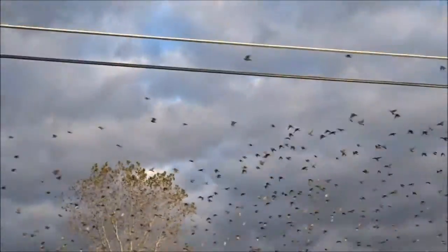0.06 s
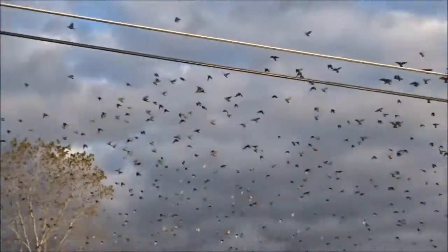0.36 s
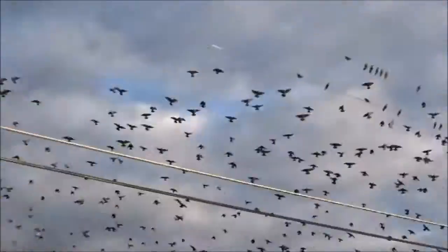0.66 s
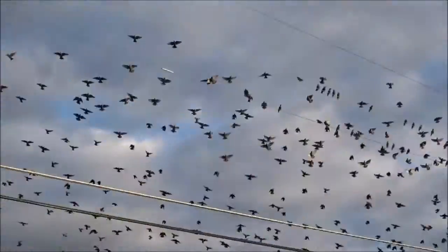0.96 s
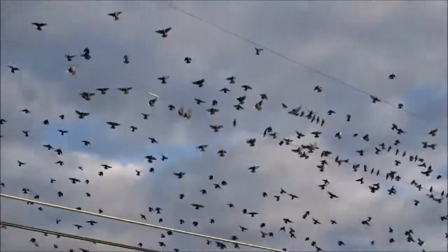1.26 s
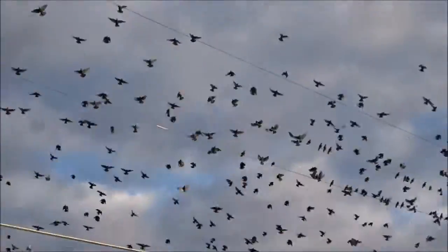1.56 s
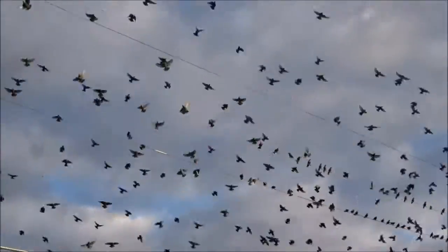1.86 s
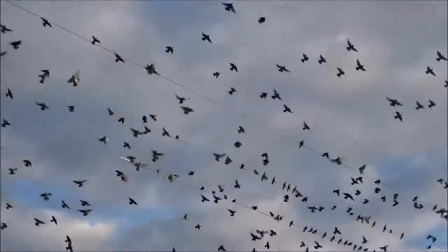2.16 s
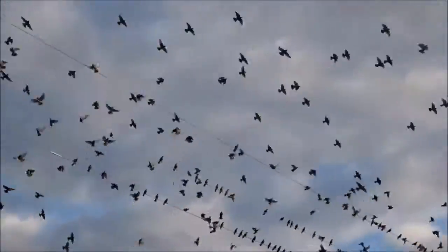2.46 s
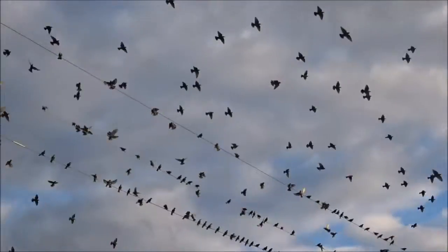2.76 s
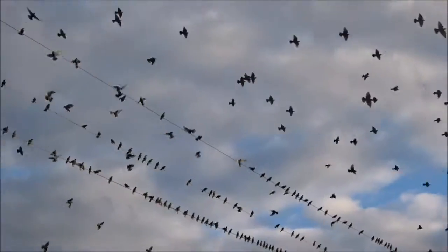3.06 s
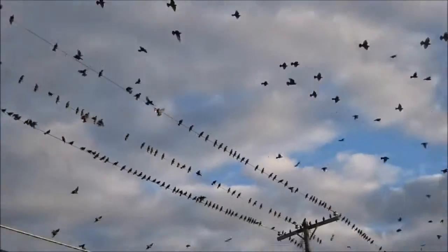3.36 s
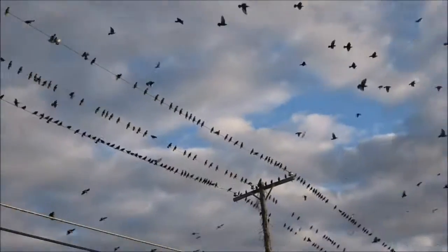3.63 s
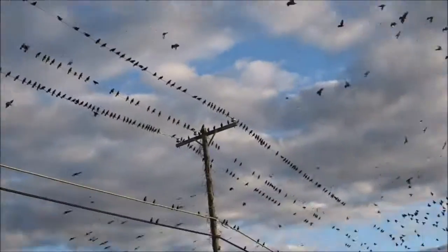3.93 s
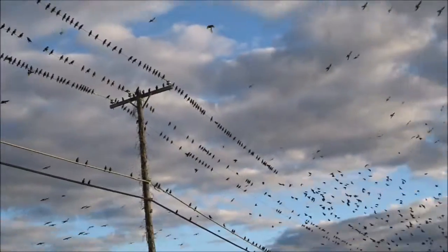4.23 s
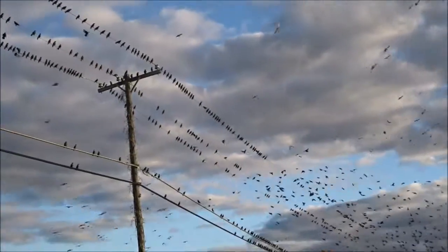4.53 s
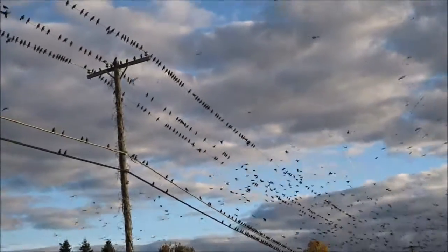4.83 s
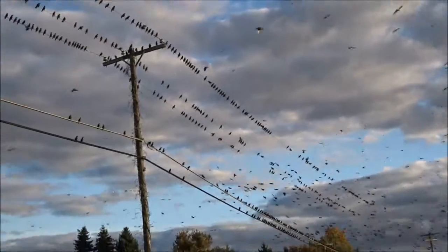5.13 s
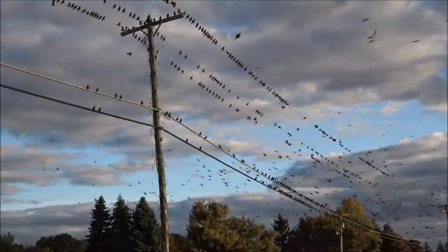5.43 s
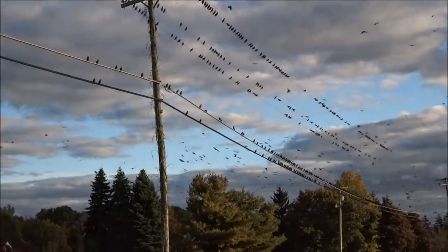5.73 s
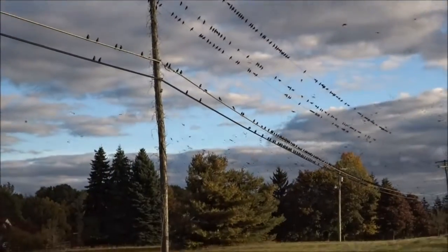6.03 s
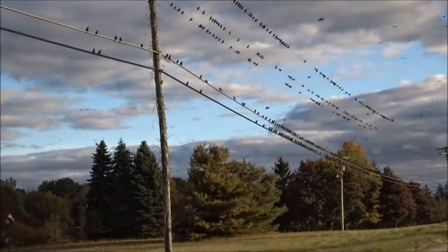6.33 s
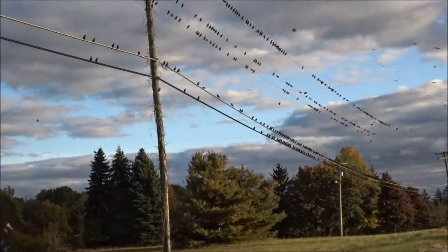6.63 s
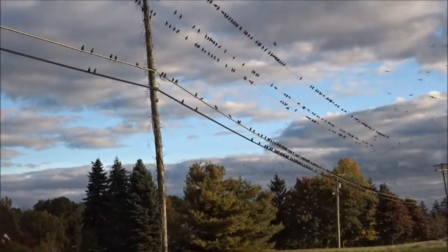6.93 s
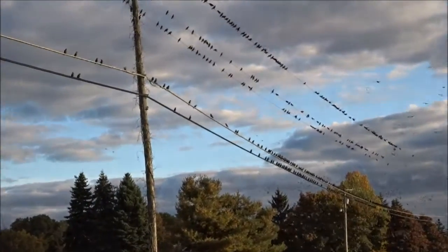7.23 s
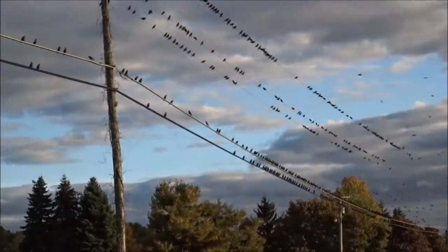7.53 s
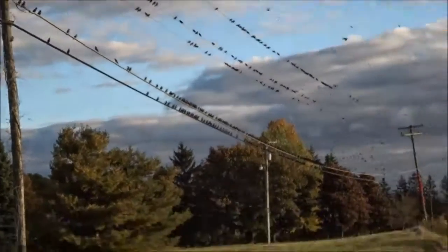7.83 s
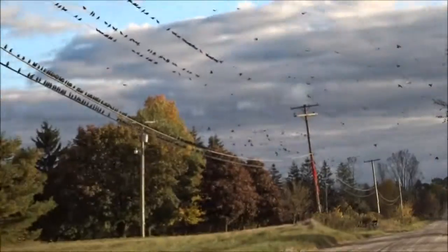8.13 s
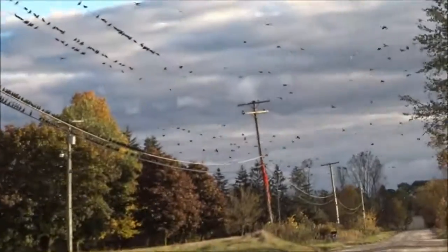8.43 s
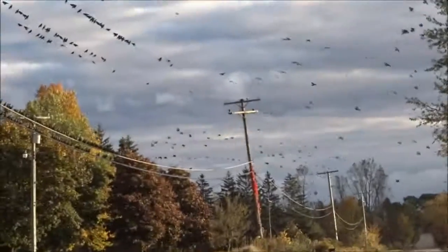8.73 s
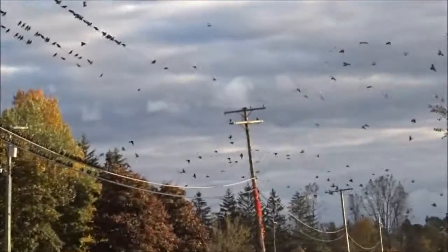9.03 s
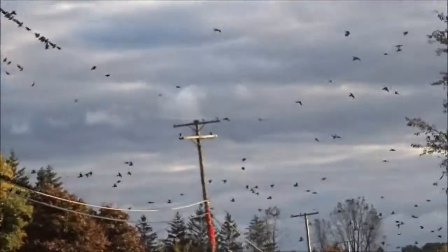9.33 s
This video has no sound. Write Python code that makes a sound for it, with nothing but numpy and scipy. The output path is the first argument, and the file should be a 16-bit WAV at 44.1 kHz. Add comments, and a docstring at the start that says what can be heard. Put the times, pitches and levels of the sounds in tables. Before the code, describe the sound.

Outdoors in open country, a dense, high babble of starlings runs throughout, dotted with nearby squeaks, thin whistles and harsh rasps. Early on there is one quick swish, and gusts rumble and thump on the microphone before settling. The chatter swells after about two seconds and stays busy, with the loudest calls near the end. Underneath lie a soft leaf rustle, a faint drone and a distant car approaching.

```python
"""A large flock of starlings chatters on power lines and overhead beside a country road.
Near birds whistle, trill, chip and rasp, each call a near-sine tone from the syrinx, over a babble
of hundreds of far ones; the tree line returns a faint echo. Wind buffets the microphone, hardest
in the first seconds, and dry leaves rustle, while distant tyres slowly grow louder.
A faint drone lies underneath; one close swish and a few bright ticks cut through."""
import sys
import numpy as np
from scipy import signal
from scipy.fft import rfft, irfft, next_fast_len
from scipy.io import wavfile

SR = 44100
rng = np.random.default_rng(int(sys.argv[2]) if len(sys.argv) > 2 else 0)


def master(y):
    """Save y as 16-bit WAV."""
    cut = np.clip(np.atleast_2d(y).T, -1, 1)
    pcm = np.round(cut * 32767)  # scale
    wavfile.write(sys.argv[1], SR, pcm.astype(np.int16))


N = 422478


def from_db(db):
    """Decibels to gain."""
    return 10 ** (np.asarray(db) / 20)


def rms_one(x):
    """Scale to unit power."""
    return x / np.sqrt(np.mean(x ** 2) + 1e-20)


def in_time(rows):
    """Turn rows of (time, values...) into one automation curve per value."""
    times, *columns = np.transpose(rows)
    return [np.interp(np.arange(N) / SR, times, column) for column in columns]


def at_hz(points, hz):
    """Read a table on a log-frequency axis."""
    return np.interp(np.log(hz), np.log(np.array(points)[:, 0]), np.array(points)[:, 1])


def add(track, s, sound):
    """Mix a short sound into a track at s seconds."""
    start = int(np.clip(s * SR, 0, N - 1))
    track[start:start + len(sound)] += sound[:N - start]


def band(x, low_hz, high_hz):
    """Second-order band-pass."""
    return signal.sosfilt(signal.butter(2, [low_hz, high_hz], "band", fs=SR, output="sos"), x)


def delayed(x, seconds):
    """Delay line, finer than one sample."""
    size = next_fast_len(N + 100)
    hz = np.arange(size // 2 + 1) * SR / size
    return irfft(rfft(x, size) * np.exp(-2j * np.pi * hz * seconds), size)[:N]


def drift(rate_hz):
    """Smooth random modulator that rolls off above rate_hz; rms 1."""
    step = max(int(SR / rate_hz / 12), 1)
    pole = np.exp(-2 * np.pi * rate_hz * step / SR)
    noise = rng.standard_normal(N + 50)[:N // step + 50]
    slow = signal.lfilter([1], [1, -2 * pole, pole ** 2], noise)[48:]
    return np.interp(np.arange(N) / step, np.arange(len(slow)), rms_one(slow))


def progress(length_s):
    """Ramp from 0 to 1 over one call, named u below."""
    return np.linspace(0, 1, max(int(length_s * SR), 64))


def piece(modulator, place, u):
    """One call's own piece of a long modulator; place is 0-1."""
    start = int(place * (N - len(u)))
    return modulator[start:start + len(u)]


def swell(u, edge):
    """Fade in and out over a share of the call."""
    return np.sin(np.pi / 2 * np.clip(np.minimum(u, 1 - u) / edge, 0, 1)) ** 2


def stereo_noise(colour):
    """Coloured noise, wide in the mids and near mono in deep bass and treble; rms 1."""
    # likeness of left and right: (frequency [Hz], correlation [0-1])
    likeness = [(60, 0.95), (200, 0.51), (800, 0.64), (1250, 0.47), (2000, 0.61), (3300, 0.86),
                (8000, 0.97)]
    size = next_fast_len(N)
    hz = np.maximum(np.arange(size // 2 + 1) * SR / size, 1)
    mid, side = rfft(rng.standard_normal((2, size)))
    alike = np.clip(at_hz(likeness, hz), 0, 1)
    spectrum = np.sqrt(1 + alike) * mid + np.sqrt(1 - alike) * side * [[1], [-1]]
    roll_off = (1 + (colour[0][0] / hz / 2) ** 2) * (1 + (hz / colour[-1][0] / 2) ** 2)
    return rms_one(irfft(from_db(at_hz(colour, hz)) / roll_off * spectrum, size)[:, :N])


def far_traffic(level_db=-44):
    """The even hush of far traffic."""
    # spectrum of the hush: (frequency [Hz], relative level [dB])
    colour = [(60, -15), (200, -18), (380, -13.5), (490, -5.5), (600, -5.5), (1000, -8), (1550, -8.5),
              (2100, -2.5), (4000, -52)]
    return from_db(level_db) * stereo_noise(colour)


def hum(hz=487, width_hz=22, level_db=-55):
    """A faint, wavering drone from far away."""
    return from_db(level_db) * rms_one(band(rng.standard_normal(N), hz - width_hz / 2, hz + width_hz / 2))


def tyres(road_db=-47.5, car_db=-38, nearest_s=9.47, nearest_m=26, speed_m_per_s=26.4):
    """Steady road noise, and one car that grows louder as its distance shrinks."""
    # spectrum of tyre roar: (frequency [Hz], relative level [dB])
    colour = [(400, -13.5), (650, -10), (900, 1), (1100, -6), (1400, -18), (3000, -48)]
    along_m = speed_m_per_s * (np.arange(N) / SR - nearest_s)
    car = from_db(car_db) * nearest_m / np.hypot(nearest_m, along_m)
    return np.hypot(from_db(road_db), car) * stereo_noise(colour)


def leaves(trim_db=4.5, flicker_db=1.6):
    """Dry leaves stir in the wind: a bright, flickering hiss."""
    # rise and fall of the rustle: (time [s], relative level [dB])
    rustle = [(0.0, -48.5), (0.64, -63.5), (1.41, -55), (1.97, -47.5), (2.88, -48.5), (3.92, -44.5),
              (5.41, -55), (6.3, -54.5), (8.78, -51), (9.58, -53)]
    # spectrum of the rustle: (frequency [Hz], relative level [dB])
    colour = [(1500, -3), (4000, -4), (8000, 1), (10500, 3), (13000, 1.5), (16000, -1)]
    return from_db(in_time(rustle)[0] + trim_db + flicker_db * drift(60)) * stereo_noise(colour)


def swish(end_s=.502, rush_s=.1, rush_db=-26, swell_db_per_s=108, snap_s=.018, snap_db=-26):
    """A close rush of air swells, peaks in a short snap and stops dead."""
    # spectrum of the rush: (frequency [Hz], relative level [dB])
    colour = [(300, 2), (1500, -1.5), (3000, -0.5), (7000, 6), (10000, 3), (16000, -13)]
    to_go_s = end_s - np.arange(N) / SR
    rush = from_db(rush_db - swell_db_per_s * np.maximum(to_go_s, 0)) / (1 + (to_go_s / rush_s) ** 10)
    snap = from_db(snap_db) / (1 + (to_go_s / snap_s) ** 10)
    gate = np.exp(np.clip(to_go_s / .0012, -20, 0))
    roughness = from_db(drift(202))
    return (rush + snap) * gate * roughness * stereo_noise(colour)


def airflow_db(attack_s=.017, release_s=.014, build_db=1.5):
    """Gusts ride on the breeze: each sets in quickly, builds and drops away."""
    # the breeze between gusts: (time [s], level [dB])
    breeze = [(0, -42.5), (2.1, -39), (3.0, -45.5), (3.45, -40), (3.8, -70), (4.4, -61.5), (4.9, -43.5),
              (5.5, -63), (7.1, -66.5), (8.4, -46.5), (9.4, -65)]
    # gusts on the microphone: (start [s], length [s], level [dB])
    gusts = [(0, .13, -29), (.31, .03, -35.5), (.505, 0.058, -24), (0.649, 0.032, -28), (0.738, .1, -29),
             (0.882, 0.083, -30.5), (1.064, 0.097, -29.5), (1.248, .05, -29), (1.432, 0.042, -35),
             (1.62, .38, -31.5), (2.031, 0.25, -28.5), (2.431, 0.056, -19.5), (2.54, 0.049, -31),
             (2.634, .15, -30), (3.187, 0.077, -31), (3.301, 0.2, -30.5), (3.518, 0.117, -39),
             (4.352, 0.028, -36.5), (4.723, 0.037, -35), (4.82, 0.033, -39), (4.918, .1, -39),
             (6.179, 0.063, -44.5), (6.573, 0.076, -46), (7.73, 0.1, -45), (9.502, 0.046, -42)]
    t = np.arange(N) / SR
    power = from_db(in_time(breeze)[0]) ** 2
    for s, length, db in gusts:
        fade = np.maximum((s - t) / attack_s, 0) + np.maximum((t - s - length) / release_s, 0)
        active = fade < 10
        build = build_db * (np.clip((t[active] - s) / length, 0, 1) - .5)
        power[active] += (from_db(db + build) * np.exp(-fade[active])) ** 2
    return 10 * np.log10(power)


def diaphragm(pressure):
    """The microphone rounds off the strongest eddies to a dull thump."""
    return signal.sosfilt(signal.butter(2, 900, fs=SR, output="sos"), 1.1 * np.tanh(pressure / 1.1))


def wind(lumpy_db=6.5, crossing_s=.00082, eddy_cycles=.43, brisk_db=-38):
    """Light air rumbles; brisk gusts shed quicker eddies. Both hit the left port just before the right."""
    # spectrum of the turbulence: (frequency [Hz], relative level [dB])
    colour = [(20, -24), (50, -18), (100, -5.5), (190, -2), (290, -2.5), (420, -8), (700, -13.5),
              (1500, -33)]
    # single strong eddies: (time [s], strength [dB], pitch [Hz])
    strong_eddies = [(0.52, -17.5, 260), (0.547, -19, 312), (.754, -12, 372), (.788, -19, 260),
                     (0.827, -15.5, 350), (2.198, -16.5, 224), (2.261, -13.5, 256), (2.278, -17, 200),
                     (2.443, -22, 240), (2.458, -17, 238), (2.472, -8, 250), (2.483, 4.5, 307),
                     (2.775, -14.5, 313)]
    gust_db = airflow_db()
    lumps = stereo_noise(colour) * from_db(lumpy_db * np.clip(drift(48), -2, 2))
    rumble, flutter = rms_one(band(lumps, 40, 190)), rms_one(band(lumps, 108, 1500))
    eddies, t = np.zeros(N), np.arange(-SR // 50, SR // 50) / SR
    for s, db, hz in strong_eddies:
        envelope = from_db(db) * np.exp(-(t * hz / eddy_cycles) ** 2 / 2)
        add(eddies, s + t[0], envelope * np.sin(2 * np.pi * hz * t))
    brisk = 1 / (1 + from_db(brisk_db - gust_db))
    buffet = np.sqrt(1 - brisk) * rumble + np.sqrt(brisk) * flutter[::-1, ::-1]  # reversed to decorrelate
    left, right = from_db(gust_db) * buffet + eddies
    return diaphragm(np.array([left, delayed(right, crossing_s)]))


def ticks(decay_s=.0022, low_hz=7200, high_hz=10500):
    """Bright snaps a few milliseconds long."""
    # dry ticks: (time [s], relative level [dB])
    hits = [(0.351, -12.5), (3.361, -11), (6.734, -11.5), (7.009, -19)]
    out, t = np.zeros(N), np.arange(SR // 50) / SR
    for (s, db), grit in zip(hits, rng.standard_normal((len(hits), len(t)))):
        add(out, s, from_db(db) * grit * np.exp(-t / decay_s) / 2)
    return band(out + 1e-18, low_hz, high_hz)


def field_echo(calls, echo_db=-12.5, t60_s=.15, width=.118, left_lag_s=5e-6):
    """The flock sits a little to the right; ground and trees scatter a thin tail behind its calls."""
    t = np.arange(SR // 2) / SR
    mid, side = band(rng.standard_normal((2, len(t))), 420, 13500)
    tail = (mid + width * side * [[1], [-1]]) * from_db(-60 * t / t60_s) * (t > .003)
    tail = tail / np.sqrt(np.sum(tail ** 2) / 2)
    echo = signal.fftconvolve(calls[None], tail, axes=1)[:, :N]
    return np.array([delayed(calls, left_lag_s), calls]) + from_db(echo_db) * echo


def syrinx(hz, loudness, overtone_db):
    """A bird's voice: a near sine on a pitch track, with a weak octave that fades up high; rms 1."""
    phase = 2 * np.pi * np.cumsum(hz) / SR
    octave = from_db(overtone_db) / (1 + (hz / 6500) ** 6) * (hz < SR / 4)
    return rms_one(loudness * (np.sin(phase) + octave * np.sin(2 * phase)))


def twitter(count=70, low_hz=5600, high_hz=9400, slide=.06, ragged=.0187, spread_db=7):
    """Farther birds add ragged little slides at random times, pitches and strengths."""
    out, shake = np.zeros(N), drift(90)
    for when, pitch, long, slope, size, place in rng.random((count, 6)):
        u = progress(.0246 + .0654 * long)
        bend = slide * (2 * slope - 1) * (2 * u - 1) + ragged * piece(shake, place, u)
        hz = low_hz * (high_hz / low_hz) ** pitch * np.exp(bend)
        note = syrinx(hz, swell(u, edge=.32), overtone_db=-25)
        add(out, when * N / SR, from_db(spread_db * (size - 1)) * note)
    return out


def babble(low_hz, high_hz, slide, harsh, count):
    """Many far birds in one register: very short, hoarse notes of differing strength; rms 1."""
    out, chaos = np.zeros(N), drift(614)
    for k, (when, pitch, long, slope, arch, rough, size, place) in enumerate(rng.random((count, 8))):
        u = progress(.01 + .05 * long ** 3)
        bend = slide * ((2 * slope - 1) * (2 * u - 1) - (arch - .3) * (2 * u - 1) ** 2)
        jitter = harsh * (.5 + rough) * piece(chaos, place, u)
        hz = low_hz * (high_hz / low_hz) ** pitch * np.exp(bend + jitter)
        envelope = from_db(15 * size ** 3 * (1 - long / 2)) * u * (1 - u)
        add(out, (k + when) / count * N / SR, envelope * np.sin(2 * np.pi * np.cumsum(hz) / SR))
    return rms_one(out)


def flock(surge_db=.77):
    """Far calls surge a little in three registers, and the farthest blur; returns (voices, wash)."""
    # faders of the registers: (time [s], low chucks [dB], middle chatter [dB], high squeaks [dB])
    faders = [(0.0, -43.5, -45.5, -50), (0.48, -44, -44.5, -42.5), (1.39, -41, -42.5, -45),
              (1.79, -40.5, -35, -38), (2.67, -40, -36.5, -43.5), (3.36, -37, -34.5, -43),
              (3.76, -40.5, -34.5, -43.5), (5.36, -38.5, -36.5, -45), (5.74, -34.5, -38, -44.5),
              (6.46, -40.5, -37, -45.5), (6.72, -38, -34.5, -42), (8.32, -42, -35.5, -45),
              (8.48, -42, -34.5, -42), (8.94, -42, -35.5, -51), (9.1, -42, -36, -46),
              (9.58, -37.5, -36, -42.5)]
    # brief dips in the upper two registers: (centre [s], length [s], depth [dB])
    lulls = [(5.93, 0.13, 0.5), (6.467, 0.063, 3.5), (7.363, 0.15, 4.5), (8.114, 0.24, 4.5),
             (9.166, 0.091, 3.5)]
    t = np.arange(N) / SR
    low, middle, high = (from_db(db + surge_db * drift(4)) for db in in_time(faders))
    lull = from_db(-sum(depth / (1 + (2 * (t - s) / length) ** 4) for s, length, depth in lulls))
    middle, high = middle * lull, high * lull
    chucks = babble(2000, 3300, slide=.0925, harsh=.057, count=1200)
    chatter = babble(3300, 6300, slide=.0993, harsh=.0457, count=1200)
    squeaks = babble(6400, 8700, slide=.052, harsh=.0296, count=600)
    voices = low * chucks + middle * chatter + high * (from_db(-.5) * squeaks + from_db(-4.5) * twitter())
    voices *= np.sqrt(middle / middle.max())  # single notes stand out when the flock is near and loud
    low_wash = low * stereo_noise([(1300, -7), (1900, -2), (2700, 4), (3300, .5), (4500, -80)])
    middle_wash = middle * stereo_noise([(2400, -2), (3400, 1.5), (5000, -1), (6400, -3.5), (8500, -45)])
    high_wash = high * stereo_noise([(5000, -26), (6600, 6), (8200, 6), (10000, -3), (13000, -57)])
    return voices, from_db(-1.6) * low_wash + from_db(-2.23) * middle_wash + from_db(-3.5) * high_wash


def trill(start_s=6.055, length_s=.11, pitch_hz=5100, level_db=-34, pips_per_s=60, dip=.09, flick=.019):
    """A run of quick pips whose pitch dips and rises again."""
    out, u = np.zeros(N), progress(length_s)
    pips = np.sin(np.pi * pips_per_s * length_s * u) ** 2
    hz = pitch_hz * (1 + dip * (2 * u - 1) ** 2 + flick * (pips - 1))
    add(out, start_s, from_db(level_db) * syrinx(hz, pips * swell(u, edge=.08), overtone_db=-25))
    return out


def chips(hoarse=.011, top_buzz_hz=1350, buzz=.69):
    """The pitch shoots up an octave, loudest on the way, then sags and fades; a buzz adds side tones."""
    # flight calls: (time [s], length [s], top pitch [Hz], level [dB])
    calls = [(1.638, 0.038, 7750, -33), (1.762, 0.034, 7030, -35), (1.89, .032, 7040, -37),
             (2.062, 0.038, 7200, -33.5), (2.176, 0.02, 8000, -25.5), (2.284, 0.021, 5000, -29),
             (2.533, .066, 7450, -32.5), (7.218, 0.029, 7120, -35), (7.526, .039, 7120, -35),
             (8.623, 0.045, 7270, -30), (8.737, 0.057, 7980, -29), (9.248, .04, 7660, -29.5)]
    out, shake = np.zeros(N), drift(700)
    for (s, length, top, db), place in zip(calls, rng.random(len(calls))):
        u = progress(length)
        arch = np.interp(u, [0, .14, .33, .6, 1], [.45, .62, 1, .98, .85])
        hz = top * arch * (1 + hoarse * piece(shake, place, u))
        loudness = np.interp(u, [0, .13, .35, .7, 1], [0, 1, .45, .5, 0])
        loudness *= 1 + buzz * np.sin(2 * np.pi * top_buzz_hz * np.cumsum(arch) / SR)
        add(out, s, from_db(db) * syrinx(hz, loudness, overtone_db=-19))
    return out


def throat(sound, hz, q=1.8, ring=.48):
    """The windpipe rings near the pitch of the call; rms 1."""
    b, a = signal.iirpeak(hz, q, fs=SR)
    return rms_one(sound + ring * signal.lfilter(b, a, sound))


def rasps(mean_pulse_hz=110, pulse_db=1.5, rough_db=2.5, scatter=.85, grit=.42):
    """The syrinx runs chaotically: leaping pitch, uneven pulses and grit up the treble."""
    # harsh calls: (time [s], length [s], pitch [Hz], level [dB], pitch spread [relative])
    calls = [(1.529, 0.099, 4940, -32, 0.41), (1.617, 0.047, 5170, -28.5, 0.49),
             (1.753, 0.03, 4960, -27.5, 0.33), (1.854, 0.084, 4940, -28.5, 0.33),
             (1.94, .089, 4750, -29, 0.4), (2.16, 0.041, 5200, -26.5, 0.17),
             (2.341, 0.041, 5160, -26, 0.42), (2.42, .046, 5550, -34.5, 0.088),
             (2.805, .1, 4580, -35, 0.37), (2.904, .064, 3780, -34.5, .15),
             (3.214, 0.023, 2300, -32.5, .06), (3.321, 0.057, 2170, -33, .15),
             (3.497, 0.063, 3470, -32, 0.26), (3.521, 0.1, 6170, -33.5, 0.16),
             (4.159, 0.03, 2900, -32, 0.27), (4.576, 0.038, 2730, -29.5, 0.11),
             (5.018, 0.045, 2590, -32.5, .17), (5.128, 0.15, 4620, -35, 0.27), (5.38, .064, 5250, -36, .18),
             (5.484, .059, 4670, -33.5, .08), (5.708, .062, 4700, -36, 0.21),
             (5.979, 0.05, 2510, -29, 0.098), (6.546, 0.068, 3890, -33, 0.29),
             (6.766, .048, 4500, -36, .12), (7.157, 0.096, 3720, -36.5, .34),
             (8.416, .06, 4927, -20, 0.073), (8.426, .05, 3790, -24.5, .13),
             (8.475, .083, 4870, -35, 0.072), (8.469, 0.088, 3290, -31, 0.11),
             (8.903, 0.13, 6500, -27, 0.23)]
    out, chaos, flicker, wander = np.zeros(N), drift(450), drift(390), drift(57.6)
    crackle = rms_one(band(rng.standard_normal(N), 2200, 10300))
    loudest_db = max(call[3] for call in calls)
    for (s, length, pitch, db, spread), (a, b) in zip(calls, rng.random((len(calls), 2))):
        u = progress(length + .012)
        pulses = np.sin(2 * np.pi * mean_pulse_hz * (.6 + .8 * b) * length * u + piece(wander, a, u))
        hz = pitch * np.exp(scatter * spread * (piece(chaos, a, u) + .5 * pulses))
        loudness = swell(u ** .76, edge=.27) * from_db(pulse_db * pulses + rough_db * piece(flicker, b, u))
        nearness = np.sqrt(from_db(db - loudest_db))  # air takes the grit off far calls
        loudness *= 1 + grit * nearness * piece(crackle, b, u)
        add(out, s - .005, from_db(db) * throat(syrinx(hz, loudness, overtone_db=-8.5), pitch))
    return band(out + 1e-18, 1870, 13700)


def whistle(glide, db, warble, modulators, places, unsteady_db=2, buzz_hz=2400, buzz=3.1):
    """One note along a pitch glide; a warble shakes its pitch and level, and forced notes buzz."""
    (shake, flicker), (a, b) = modulators, places
    t = np.arange(len(glide)) / SR
    warble_hz = 73 + 50 * b
    flutter = np.sin(2 * np.pi * (warble_hz * t + a))
    tremble = piece(shake, a, t)
    hz = glide * (1 + warble * (flutter + tremble) / 3 + .0039 * tremble + .006 * piece(flicker, a, t))
    tremolo_db = unsteady_db * piece(flicker, b, t) + 120 * warble * flutter
    loudness = swell(t / t[-1], edge=.11) * from_db(tremolo_db)
    # the two sides of the syrinx beat against each other, more the louder the call
    loudness *= 1 + buzz * from_db(db) * np.sin(2 * np.pi * buzz_hz * t + tremble)
    return from_db(db) * syrinx(hz, loudness, overtone_db=db + 13)  # forcing brings out the octave


def whistles(arch_warble=.021, slur_warble=.017, top_share=.42):
    """Near birds whistle in arches that rise and sink back, and slurs that slide from pitch to pitch."""
    # thin arched whistles: (time [s], length [s], top pitch [Hz], level [dB], end sag [share of pitch])
    arches = [(.163, .058, 9020, -39.5, .07), (1.688, 0.026, 5240, -31, .1), (1.964, 0.034, 7500, -32, .1),
              (3.923, .11, 8350, -41, .09), (4.245, 0.13, 9220, -41.5, 0.089),
              (4.447, 0.032, 6040, -35.5, .06), (4.719, 0.23, 5170, -41, .06),
              (5.108, 0.053, 8600, -39, .04), (5.532, 0.023, 8500, -39, .1),
              (5.604, 0.091, 8330, -36, 0.023), (5.782, 0.042, 8530, -33.5, .02),
              (5.943, .03, 8000, -32.5, .02), (6.023, 0.25, 9120, -40.5, 0.12), (6.72, .2, 8850, -39, .03),
              (7.52, 0.15, 8680, -40, 0.018), (7.749, 0.072, 9200, -42.5, .05),
              (7.894, .12, 7930, -37, 0.19), (8.466, .11, 7400, -36, .03), (8.8, 0.28, 8200, -37.5, .07),
              (8.894, 0.025, 7380, -28, .02), (8.947, 0.045, 7100, -20.5, 0.12),
              (9.041, 0.032, 7850, -23, .15), (9.212, 0.092, 4860, -34, .1),
              (9.297, 0.09, 4750, -28.5, 0.062), (9.5, 0.13, 7500, -35.5, 0.1)]
    # sliding whistles: (time [s], length [s], start pitch [Hz], end pitch [Hz], level [dB])
    slurs = [(.621, 0.053, 7000, 5200, -37), (0.676, 0.078, 5650, 4950, -43),
             (0.879, 0.28, 2276, 2136, -42.5), (.921, 0.091, 4800, 4000, -47),
             (1.081, 0.3, 2125, 1945, -45.5), (1.525, 0.018, 7700, 4380, -27.5),
             (2.459, 0.051, 5500, 3650, -35), (3.029, 0.13, 2930, 2600, -38),
             (3.58, .032, 5980, 6500, -29.5), (3.606, 0.054, 4550, 3740, -32.5),
             (5.144, 0.19, 1890, 2144, -43), (6.951, .12, 2120, 2255, -40.5),
             (6.962, .063, 6730, 4180, -38), (7.975, 0.098, 2600, 2930, -34),
             (8.008, 0.056, 6450, 5300, -38.5), (8.099, 0.042, 6000, 4160, -36.5),
             (8.923, 0.028, 4570, 5750, -24), (9.002, 0.058, 5030, 5170, -29.5)]
    out, modulators = np.zeros(N), (drift(280), drift(45))
    for (s, length, top, db, sag), places in zip(arches, rng.random((len(arches), 2))):
        glide = top * (1 - sag * ((progress(length) - top_share) / (1 - top_share)) ** 2)
        add(out, s, whistle(glide, db, arch_warble, modulators, places))
    for (s, length, first, last, db), places in zip(slurs, rng.random((len(slurs), 2))):
        glide = first * (last / first) ** (progress(length) ** .8)  # fastest at the start
        add(out, s, whistle(glide, db, slur_warble, modulators, places))
    return out


def scene():
    """Birds over the field, with road, leaves and wind around them."""
    voices, wash = flock()
    near = whistles() + trill() + rasps() + chips() + ticks()
    bed = far_traffic() + leaves()
    outdoors = field_echo(near + voices) + wash + bed + hum() + tyres() + swish()
    lean_right = from_db([[-.25], [.25]])
    return outdoors * lean_right + wind()


def record(dry, cutoff_hz=15900):
    """Peaks stop at full scale and a steep low-pass takes off the very top."""
    return signal.sosfilt(signal.ellip(10, .1, 80, cutoff_hz, fs=SR, output="sos"), np.clip(dry, -1, 1))


dry = scene()
out = record(dry)
master(out)
```